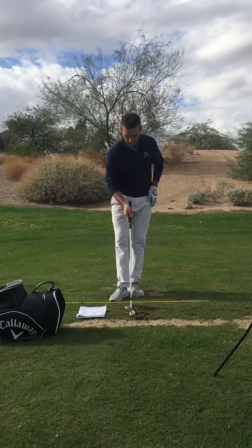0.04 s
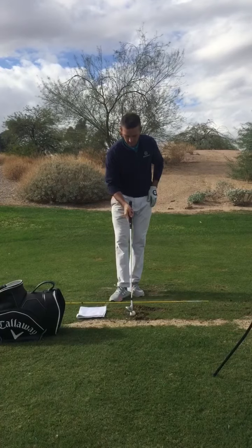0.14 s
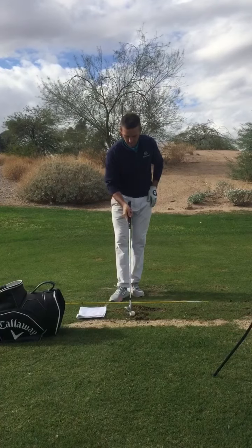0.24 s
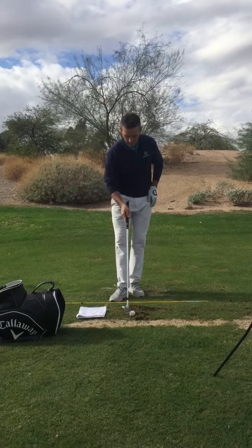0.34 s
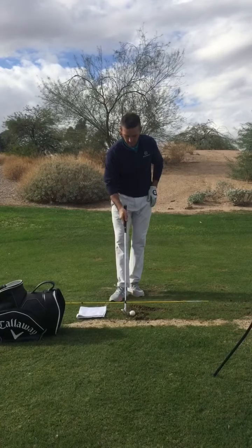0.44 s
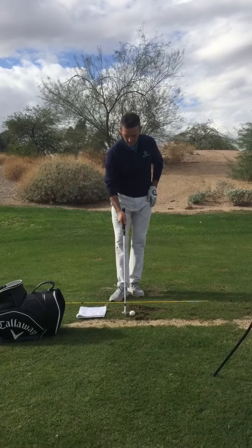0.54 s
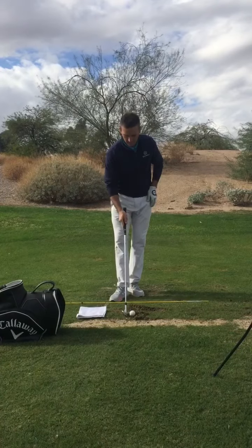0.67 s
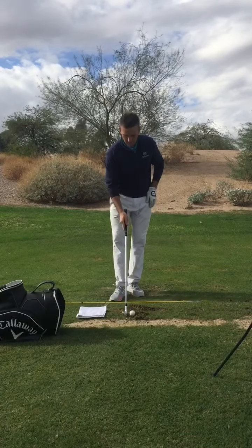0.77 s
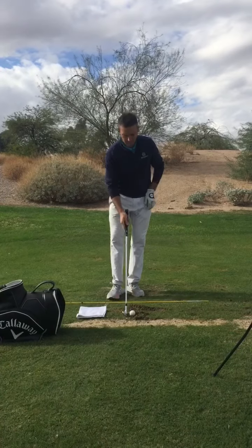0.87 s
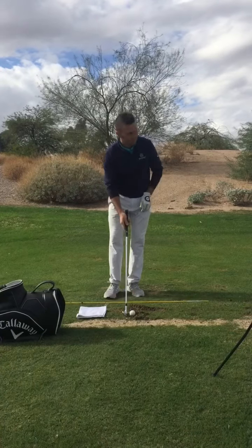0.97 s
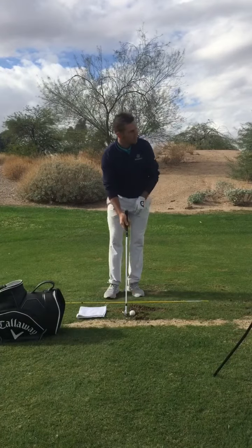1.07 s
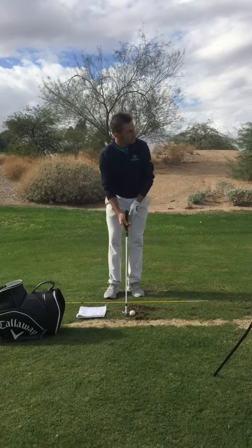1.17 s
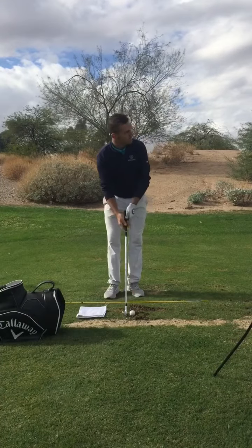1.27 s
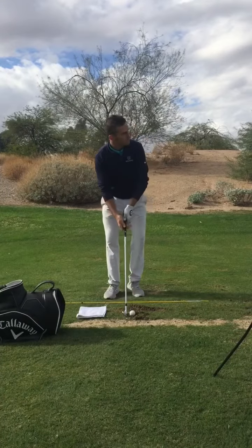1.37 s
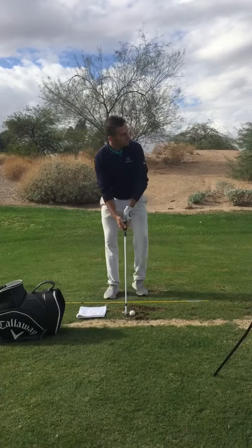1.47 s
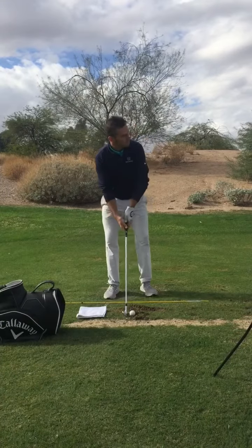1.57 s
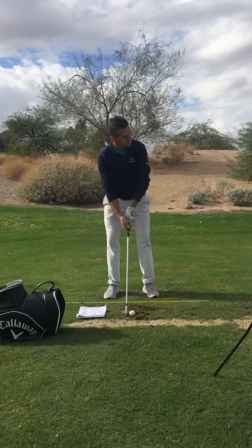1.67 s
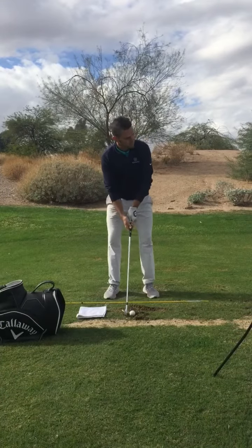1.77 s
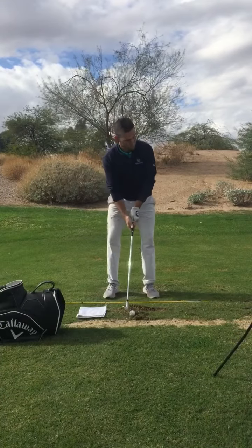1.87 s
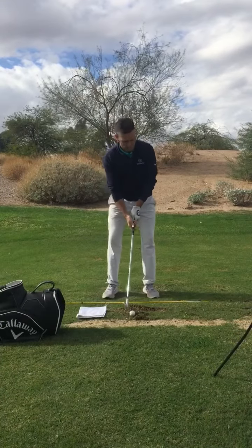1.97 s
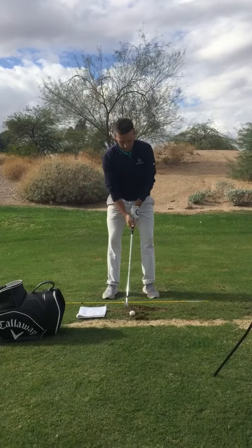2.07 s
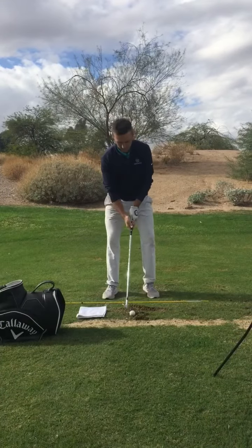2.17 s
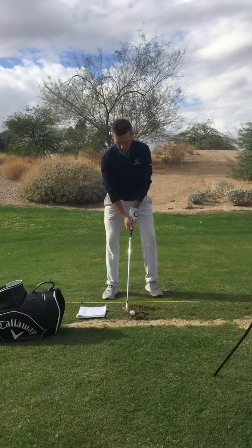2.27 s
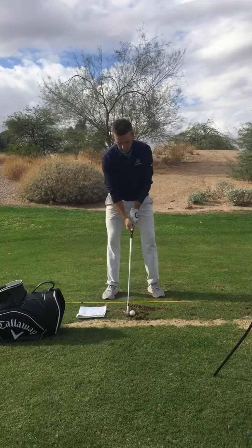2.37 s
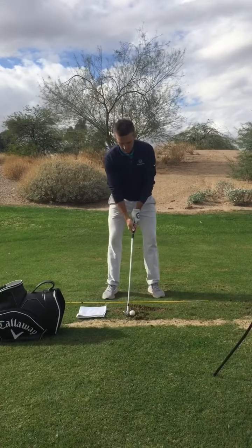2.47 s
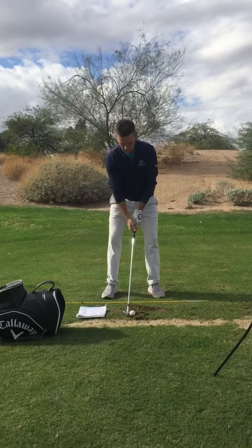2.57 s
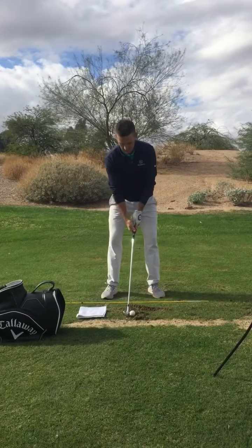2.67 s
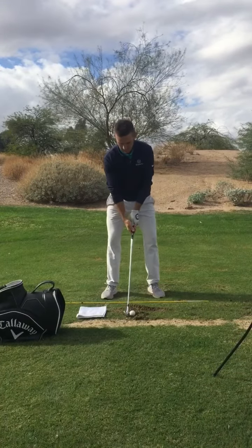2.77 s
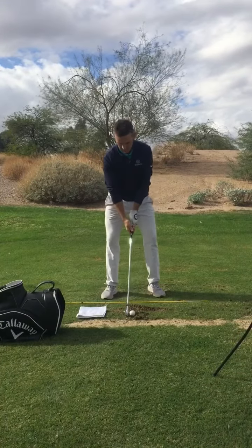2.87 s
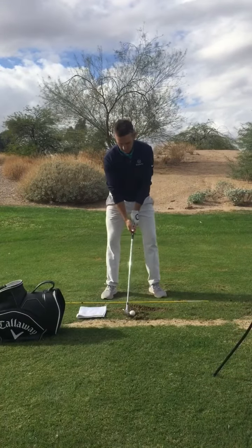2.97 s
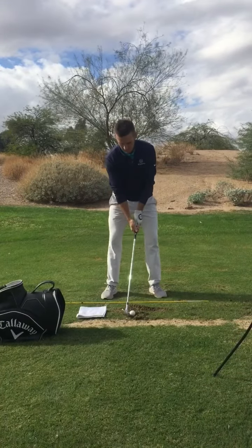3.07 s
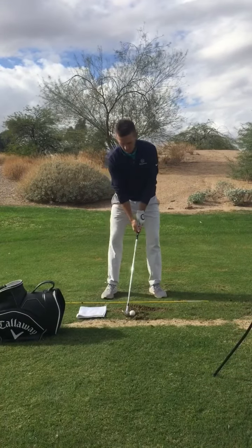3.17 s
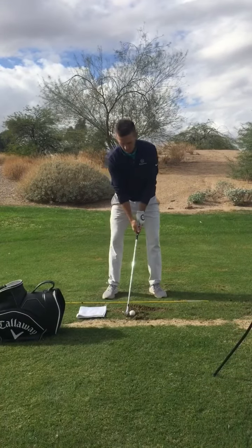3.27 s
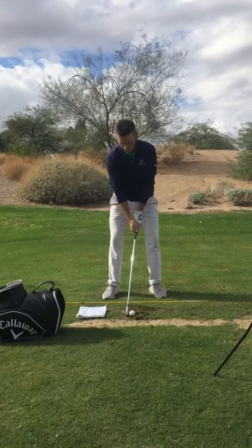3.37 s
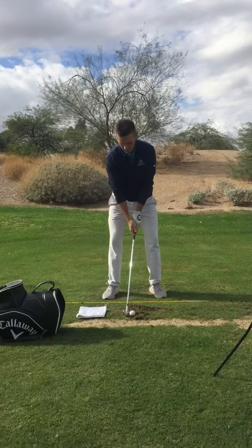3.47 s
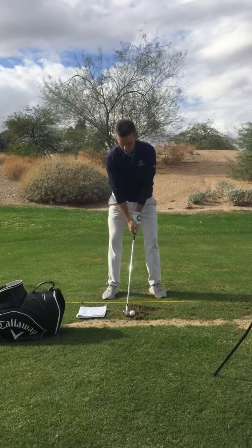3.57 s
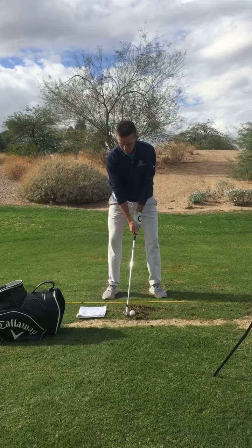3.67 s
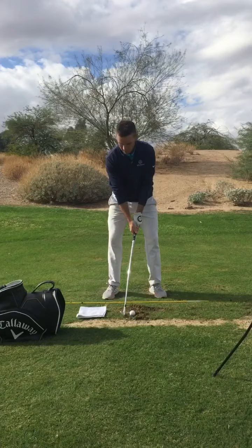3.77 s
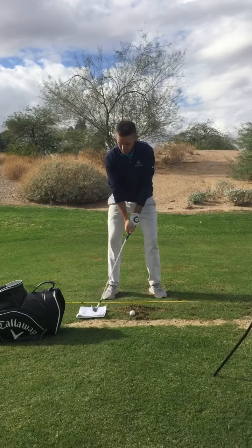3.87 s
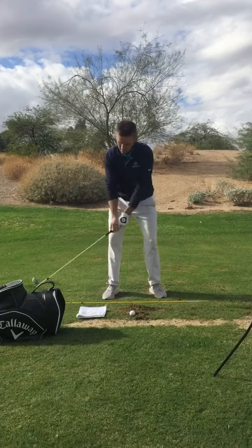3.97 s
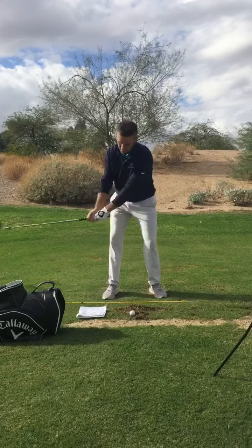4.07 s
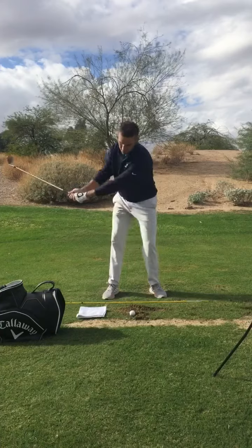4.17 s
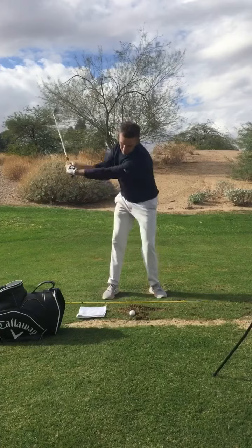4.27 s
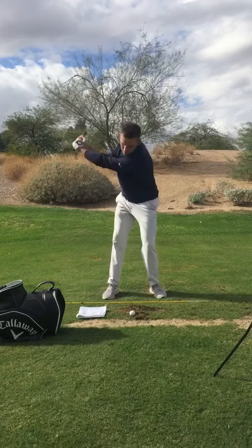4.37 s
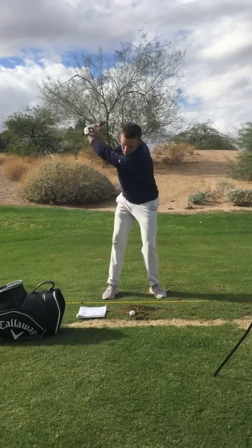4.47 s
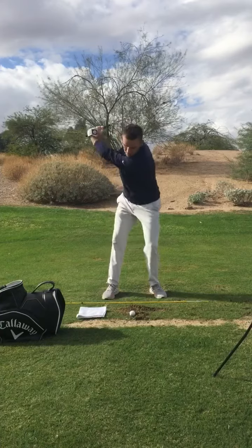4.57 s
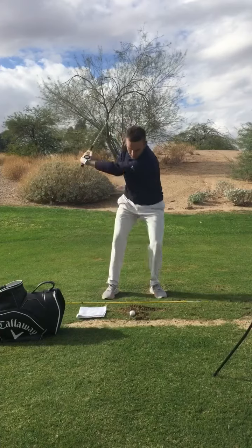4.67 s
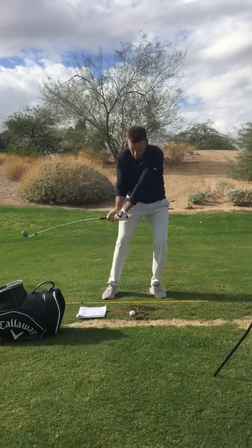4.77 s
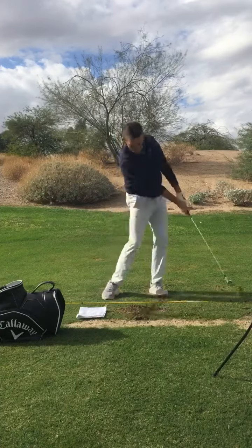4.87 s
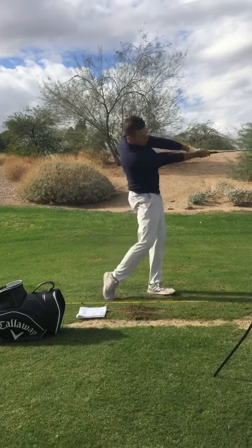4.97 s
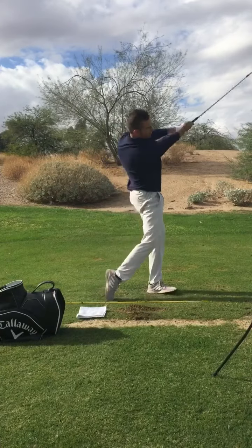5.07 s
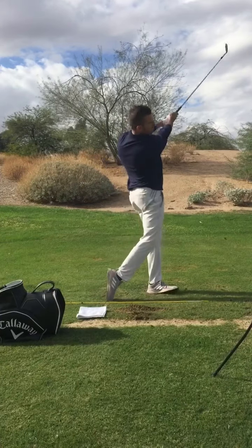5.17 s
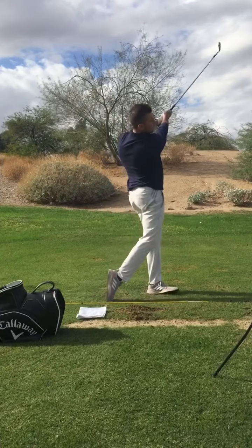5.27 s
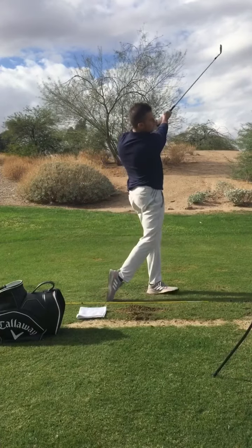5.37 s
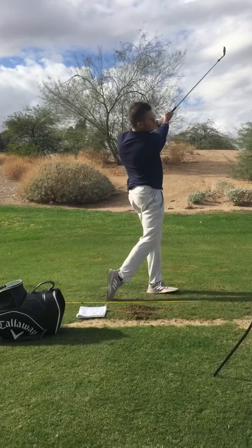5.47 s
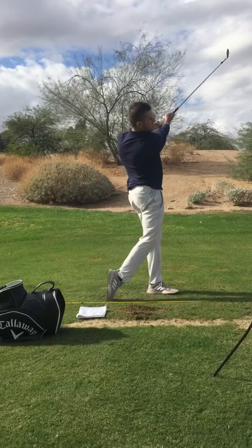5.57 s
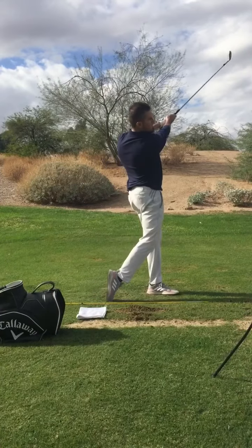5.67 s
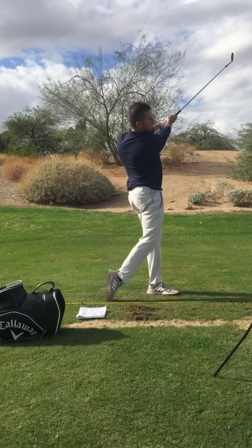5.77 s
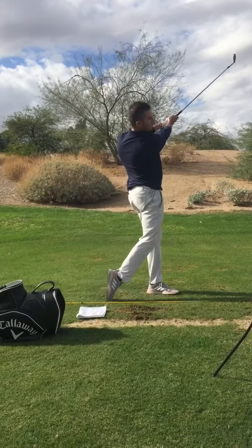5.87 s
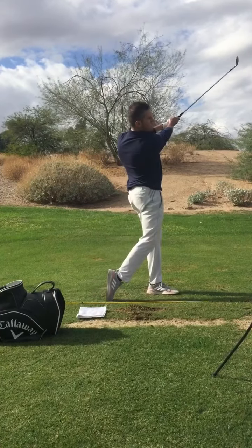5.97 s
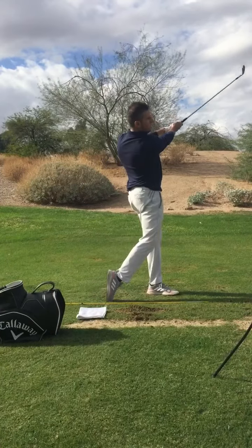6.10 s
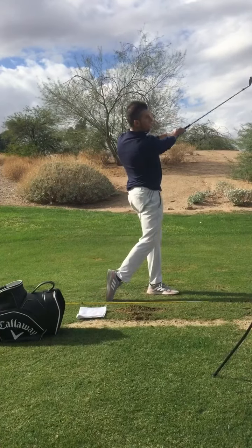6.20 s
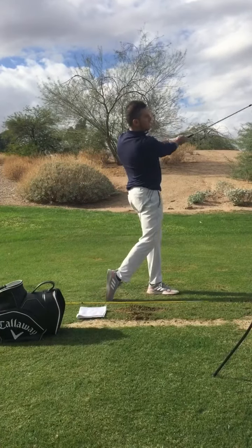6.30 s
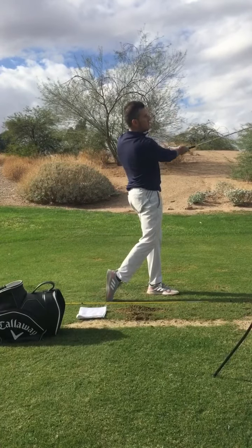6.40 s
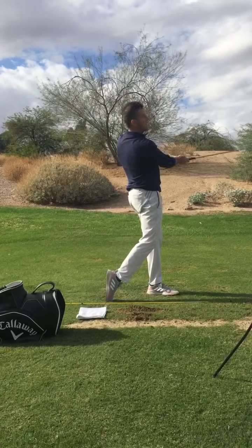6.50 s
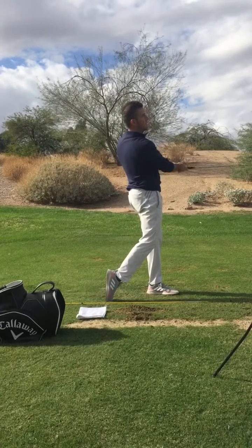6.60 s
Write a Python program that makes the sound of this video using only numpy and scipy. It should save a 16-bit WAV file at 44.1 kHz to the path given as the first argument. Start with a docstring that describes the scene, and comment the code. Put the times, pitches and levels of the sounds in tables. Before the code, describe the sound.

On an open practice range, distant traffic hums faintly under a low breeze that thumps the microphone now and then. A small bird chirps once early on, and a club softly brushes grass. After a long wait, an iron swishes down, clicks brightly on a golf ball and cuts the turf with a short knock. Soil sprays and patters, a dull tail fades, and wind buffets return near the end, heard from a few metres.

```python
"""An open practice range, one microphone a few metres from a golfer who hits an iron shot off the turf.
Far traffic hums as wavering noise that rises by chance; a breeze rumbles, its eddies buffet the microphone.
One bird chirps, a gliding fluttering tone; the club brushes the grass in a soft swell of noise.
The club swishes down as swelling noise, rings on the ball as damped sines and cuts the turf in a
burst of noise; the turf knocks, random grains of soil spray and patter, and a dull tail dies away."""
import sys
import numpy as np
from scipy import signal
from scipy.fft import rfft, irfft, next_fast_len
from scipy.io import wavfile
from scipy.ndimage import uniform_filter1d

SR = 44100
rng = np.random.default_rng(int(sys.argv[2]) if len(sys.argv) > 2 else 0)


def file_out(sig):
    """Save sig as 16-bit WAV at sys.argv[1]."""
    # one column per channel
    cols = np.atleast_2d(sig).T
    # limit, then scale
    lim = np.clip(cols, -1, 1)
    pcm = np.round(lim * 32767).astype(np.int16)
    wavfile.write(sys.argv[1], SR, pcm)


N = 292824

IMPACT_S, CHIRP_S = 4.9475, 0.49


def from_db(db):
    """Decibels to amplitude gain."""
    return 10 ** (np.asarray(db) / 20)


def rms_one(x):
    """Scale to rms 1."""
    return x / np.sqrt(np.mean(x ** 2) + 1e-20)


def over_time(rows):
    """A level in dB at every sample, in straight lines between rows of seconds and dB."""
    s, db = np.transpose(rows)
    return np.interp(np.arange(N) / SR, s, db)


def coloured(x, points):
    """Filter a sound by a curve of Hz and dB that falls 30 dB per octave beyond its ends; rms 1."""
    hz, db = np.transpose(points)
    size = next_fast_len(N)
    octave = np.log2(np.maximum(np.arange(size // 2 + 1) * SR / size, 1))
    curve_octave = np.log2(hz)
    beyond = np.abs(octave - np.clip(octave, curve_octave[0], curve_octave[-1]))
    gain = from_db(np.interp(octave, curve_octave, db) - 30 * beyond)
    return rms_one(irfft(rfft(x, size) * gain, size)[:N])


def noise(points):
    """Smooth random noise of a given spectrum; rms 1."""
    return coloured(rng.standard_normal(N), points)


def drift(hz):
    """Random wandering, low-passed at hz; rms 1."""
    low_pass = signal.butter(2, hz, fs=SR, output="sos")
    return rms_one(signal.sosfilt(low_pass, rng.standard_normal(N)))


def swell(s, width):
    """A smooth bell-shaped rise and fall centred on s."""
    return np.exp(-((np.arange(N) / SR - s) / width) ** 2)


def dying(s, t60):
    """An envelope that starts at s and falls 60 dB in each t60."""
    age = np.arange(N) / SR - s
    return (age >= 0) * from_db(-60 * np.clip(age / t60, 0, 4))


def click(s):
    """One unit impulse."""
    return (np.arange(N) == round(s * SR)) * 1.


def ring(force, modes):
    """Damped sines set off by a force, neighbouring modes in opposite sense."""
    out = np.zeros(N)
    for k, (hz, db, t60) in enumerate(modes):
        r = np.exp(-np.log(1000) / (t60 * SR))
        w = 2 * np.pi * hz / SR
        mode = signal.lfilter([0, np.sin(w)], [1, -2 * r * np.cos(w), r * r], force + 1e-18)
        out += (-1) ** k * from_db(db) * mode
    return out


def band_pass(x, low_hz, high_hz):
    """Keep one band."""
    return signal.sosfilt(signal.butter(3, [low_hz, high_hz], "band", fs=SR, output="sos"), x + 1e-18)


def eddy(s, hz, width_turns=0.56):
    """One puff of air sucks and then pushes on the diaphragm: (its samples, its pressure)."""
    first = max(int((s - 4 / hz) * SR), 0)
    last = min(int((s + 4 / hz) * SR), N)
    near = np.arange(first, last)
    turns = hz * (near / SR - s)
    return near, np.sin(2 * np.pi * turns) / (1 + (turns / width_turns) ** 2) ** 2


def traffic(waver_db=1.0, waver_hz=9, split_hz=950, swell_db=0.5, swell_hz=4, air_db=-75.5):
    """Tyres on a far road merge into a hum whose low and high parts waver apart, under a steady hiss."""
    # Far traffic. Each row: time in seconds, level in dB before the random swelling.
    road_level = [(0, -52.5), (.41, -54), (1.11, -52), (1.87, -53.5), (2.6, -53), (3.5, -52), (3.62, -54),
                  (4.5, -52), (5.2, -52), (6.35, -51), (6.64, -53.5)]
    # Colour of the far road. Each row: frequency in Hz, relative level in dB per Hz.
    road_colour = [(250, -14), (370, -15), (480, -7.5), (650, -0.5), (950, 0.5), (1200, -3.5), (1500, -11),
                   (2100, -25.5), (2800, -36)]
    # Hiss of the still air. Each row: frequency in Hz, relative level in dB per Hz.
    air_colour = [(2000, 0), (4000, 0), (4500, -1.2), (4900, -5.5), (5300, -2.2), (6300, -2.7),
                  (7700, -6.7), (8500, -4.7), (9800, -6.5), (10450, -12), (11000, -7.5), (15500, -10)]
    hum = noise(road_colour)
    low = signal.sosfiltfilt(signal.butter(3, split_hz, fs=SR, output="sos"), hum)
    high = hum - low
    wavering = low * from_db(waver_db * drift(waver_hz)) + high * from_db(waver_db * drift(waver_hz))
    swelling = from_db(over_time(road_level) + swell_db * drift(swell_hz))
    return swelling * wavering + from_db(air_db) * noise(air_colour)


def breeze(rumble_db=1.0, lumps_db=2, lumps_hz=7):
    """A lumpy low rumble of noise that follows the strength of the wind."""
    # Strength of the breeze. Each row: time in seconds, level in dB before trim and lumps.
    wind_level = [(0, -50), (1.1, -50.5), (1.85, -53.5), (2.3, -50), (3.45, -47), (3.85, -51),
                  (4.95, -45.5), (5.6, -49), (6.3, -46.5), (6.64, -50)]
    # Breeze on the microphone. Each row: frequency in Hz, relative level in dB per Hz.
    wind_colour = [(24, -41), (32, -23), (41, -9), (57, -1.5), (110, 0.5), (160, -5.5), (220, -12.5),
                   (290, -26.5), (400, -30.5)]
    lumpy_db = over_time(wind_level) + rumble_db + lumps_db * drift(lumps_hz)
    return from_db(lumpy_db) * noise(wind_colour)


def bird(flutter=0.3, flutter_hz=92, rasp_db=-70.5, rasp_peak_s=0.012, rasp_width_s=.015):
    """A raspy start of noise, then a whistle that sags to a resting note with a fast flutter."""
    length_s, attack_s, release_s = 0.069, 0.026, .016
    whistle_db, start_hz, rest_hz, sag_s = -57.5, 4600, 4030, 0.039
    age = np.arange(N) / SR - CHIRP_S
    hz = rest_hz + (start_hz - rest_hz) * np.exp(-np.maximum(age, 0) / sag_s)
    envelope = np.clip(np.minimum(age / attack_s, (length_s - age) / release_s), 0, 1)
    fluttering = 1 + flutter * np.sin(2 * np.pi * flutter_hz * age)
    whistle = envelope * fluttering * np.sin(2 * np.pi * np.cumsum(hz) / SR)
    rasp_noise = noise([(4400, -20), (4700, -4), (5900, -1), (6300, -20)])
    rasp = swell(CHIRP_S + rasp_peak_s, rasp_width_s) * rasp_noise
    return from_db(whistle_db) * whistle + from_db(rasp_db) * rasp


def bird_echo(level_db=-77, delay_s=0.18, width_s=.13):
    """The chirp comes back from the bushes as a faint smear of noise."""
    smear = noise([(3800, -10), (4250, -5), (4520, 0), (4720, -18)])
    return from_db(level_db) * swell(CHIRP_S + delay_s, width_s) * smear


def grass_brush(s=0.716, width_s=0.094, level_db=-73):
    """The club sole rustles softly over the grass while the ball is lined up: a swell of noise."""
    # Rustle of the grass. Each row: frequency in Hz, relative level in dB per Hz.
    brush_colour = [(2000, -1), (3500, 3), (4400, -2), (4900, -13), (6400, -8), (7500, -14), (12000, -22)]
    return from_db(level_db) * swell(s, width_s) * noise(brush_colour)


def gusts(level_db=0.56, flank_db=-3.5, scatter_db=1.5, scatter_octaves=0.19, jitter=0.29, count=12):
    """Each gust is an uneven run of eddies that tend to be weaker and slower towards its edges."""
    # Gusts on the microphone. Each row: centre in seconds, level of the middle eddy in dB before trim,
    # its pitch in Hz, length in seconds between the edges.
    gust_rows = [(1.244, -37, 86, 0.035), (1.307, -23, 95, 0.018), (1.324, -28, 63.5, .022),
                 (2.05, -29, 119, 0.019), (2.068, -33, 110, .015), (2.082, -30, 90, .012),
                 (2.095, -18, 125, 0.016), (2.177, -32.5, 119, 0.019), (2.755, -28, 84.4, 0.021),
                 (2.766, -23.5, 68, 0.018), (2.886, -31.5, 99, 0.03), (2.923, -33, 75, .02),
                 (3.148, -35, 98, .07), (3.418, -34.5, 70, .03), (3.486, -36.5, 70, .06),
                 (3.545, -33, 70, 0.059), (5.843, -34, 65, .06), (5.925, -35, 65, 0.03),
                 (5.981, -35, 70, .06), (6.159, -30, 70, 0.09), (6.204, -30, 58, 0.029),
                 (6.343, -29, 100, .03), (6.352, -22.5, 235, 0.018), (6.372, -31, 140, .03),
                 (6.384, -26, 390, 0.01), (6.393, -25, 147, .022), (6.402, -27, 120, .03),
                 (6.411, -22.5, 175, 0.018), (6.431, -27, 150, .025), (6.486, -29, 65, .03),
                 (6.506, -29, 220, .012), (6.511, -27, 115, .02), (6.524, -29.5, 110, .09),
                 (6.548, -33, 115, .04)]
    # loss of level and of pitch at the edge; the pitch floor holds before the random scatter
    gap_s, edge_loss_db, edge_octaves, floor_hz = 0.015, 8, 0.67, 58
    out = np.zeros(N)
    steps = np.arange(-count, count + 1)
    for s, db, hz, length in gust_rows:
        chances = rng.standard_normal((len(steps), 3))
        for step, (late, louder, higher) in zip(steps, chances):
            flank = step != 0  # the middle eddy is not scattered
            offset = gap_s * (step + flank * jitter * late)
            edge = abs(offset) / (length / 2)
            if edge < 2:  # eddies fade on past the edge, to twice its distance
                centre_hz = max(hz * 2 ** (-edge_octaves * edge), floor_hz)
                near, push = eddy(s + offset, centre_hz * 2 ** (flank * scatter_octaves * higher))
                eddy_db = db + level_db - edge_loss_db * edge
                eddy_db += flank * (flank_db + scatter_db * louder)
                out[near] += from_db(eddy_db) * push
    return out


def buffeting(churn_db=-11.5, follow_s=0.018):
    """The gusts press on the diaphragm, with fine turbulent noise that follows their strength."""
    push = gusts()
    power = uniform_filter1d(push ** 2, max(int(follow_s * SR), 1))
    strength = np.sqrt(np.maximum(power, 0))
    churn = noise([(60, 3), (130, 4), (230, -2), (330, -14), (520, -26)])
    return push + from_db(churn_db) * strength * churn


def background_rises(t60=.02, low_hz=500, high_hz=2200):
    """Small chance rises in the background noise, drawn as faint, dull, short damped sines."""
    # Chance rises. Each row: start in seconds, level in dB before the band-pass, frequency in Hz.
    rise_rows = [(1.354, -38, 888), (1.813, -37, 869), (2.628, -42, 1500), (3.655, -41, 1030)]
    rises = sum(ring(click(s), [(hz, db, t60)]) for s, db, hz in rise_rows)
    return band_pass(rises, low_hz, high_hz)


def swish(hiss_db=-49, steepness=1.7, loudest_s=4.927, hiss_half_s=.031, top_db=-60.5, top_steepness=6):
    """Air torn by shaft and head: noise swells with the sweep, its treble in a narrower peak."""
    # Torn air. Each row: frequency in Hz, relative level in dB per Hz.
    swish_colour = [(250, -8.5), (600, -4), (1000, -3), (2000, 4), (4000, -3), (5500, -17)]
    sweep = 1 / (1 + ((np.arange(N) / SR - loudest_s) / hiss_half_s) ** 2)
    top = noise([(3500, -6), (4800, 0), (7000, -3), (15000, -9)])
    hiss = from_db(hiss_db) * sweep ** steepness * noise(swish_colour)
    return hiss + from_db(top_db) * sweep ** top_steepness * top


def shaft_whoop(level_db=-38, tone_hz=490, steepness=4.7, width_hz=140, brake_t60=.03):
    """The shaft sheds vortices: a rough band of noise that rises with its speed, until the turf stops it."""
    # fastest at the bottom of the arc, half as fast this long before and after
    fastest_s, half_s = 4.943, .065
    t = np.arange(N) / SR
    speed = 1 / (1 + ((t - fastest_s) / half_s) ** 2)
    phase = 2 * np.pi * np.cumsum(tone_hz * speed) / SR
    band = drift(width_hz) * np.sin(phase) + drift(width_hz) * np.cos(phase)
    braking = (t < IMPACT_S) + dying(IMPACT_S, brake_t60)
    return from_db(level_db) * speed ** steepness * braking * band


def strike(ring_db=0.5, cut_db=-23, cut_t60=0.028, cut_delay_s=.0008):
    """The face cracks on the ball and rings in damped sines, then the blade bites the turf in noise."""
    # Broad, quickly damped resonances of the squeezed ball and the face.
    # Each row: frequency in Hz, level in dB before trim, 60 dB decay time in seconds.
    crack_modes = [(2025, -3.1, 0.0091), (4127, -1.5, 0.0085), (8822, -15.3, 0.007), (12263, -26.5, 0.0043)]
    # Club head and ball. Each row: frequency in Hz, level in dB before trim, 60 dB decay time in seconds.
    club_modes = [(916, -22.5, 0.031), (1094, -8.8, 0.0132), (1283, -12.5, 0.0145), (1406, -16.6, 0.0193),
                  (1654, -28.6, 0.031), (1999, -9.2, 0.0157), (2403, -18.5, 0.0083), (2664, -32.9, 0.0194),
                  (2767, -30.4, 0.031), (3324, -33.4, 0.031), (3711, -21.7, 0.0232), (3962, -16.3, 0.0145),
                  (4095, -5.2, 0.0126), (4426, -18.0, 0.0158), (4776, -28.4, 0.0232), (4866, -33.1, 0.0223),
                  (5450, -30.0, 0.031), (5550, -27.3, 0.0176), (6377, -21.9, 0.0083), (7152, -27.7, 0.0122),
                  (8312, -33.8, 0.0225), (8750, -28.6, 0.0119), (9738, -24.7, 0.0149),
                  (11221, -29.5, 0.0201), (12729, -17.8, 0.0083), (13225, -27.2, 0.0187),
                  (13887, -23.4, 0.0083), (14690, -23.5, 0.011)]
    # Blade cutting the turf. Each row: frequency in Hz, relative level in dB per Hz.
    cut_colour = [(800, -16.5), (1100, -7.5), (2000, 2), (3100, -1), (4200, -3), (5200, 3), (7000, 1),
                  (10000, -2), (15000, -14)]
    blow = click(IMPACT_S)
    ball = from_db(ring_db) * (ring(blow, crack_modes) + ring(blow, club_modes))
    cut = from_db(cut_db) * noise(cut_colour) * dying(IMPACT_S + cut_delay_s, cut_t60)
    return ball + cut


def thud(knock_db=-1):
    """The turf gives a short hollow knock of damped sines, then deep bumps as it brakes the blade."""
    # Knock of the turf. Each row: frequency in Hz, level in dB before trim, 60 dB decay time in seconds.
    turf_modes = [(275, -29, 0.045), (390, -23, 0.03), (480, -26, 0.025), (730, -31.4, 0.03)]
    # The ground brakes the blade. Each row: centre in seconds, level in dB, pitch in Hz.
    bump_rows = [(4.956, -30, 150), (4.978, -35, 80)]
    out = from_db(knock_db) * ring(click(IMPACT_S), turf_modes)
    for s, db, hz in bump_rows:
        near, push = eddy(s, hz)
        out[near] += from_db(db) * push
    return out


def divot(grains_per_s=16000, spread_db=2.5, clumps_db=0.8, clumps_hz=50):
    """Fine soil sprays through the grass as clumped random grains; a few larger bits tick in noise."""
    # Thrown soil. Each row: frequency in Hz, relative level in dB per Hz.
    spray_colour = [(900, -1), (2200, 1), (4000, -5), (7500, -7.5), (11000, -13), (15500, -15)]
    # Clods and grit. Each row: start in seconds, level in dB, 60 dB decay time in seconds.
    clod_rows = [(4.9645, -44, .006), (4.9662, -44, .006), (5.003, -57, .01), (5.011, -55, .01),
                 (5.0277, -58, .01), (5.1294, -48, .008)]
    # A clod's tick. Each row: frequency in Hz, relative level in dB per Hz.
    clod_colour = [(1600, -5), (4100, 0), (6000, -8), (7500, -20), (14000, -25)]
    # the spray builds up, holds, then thins out as a power of the time since the blow
    spray_db, attack_s, hold_s, thinning = -57.3, .04, 0.024, 1.6
    landing = rng.random(N) < grains_per_s / SR
    grains = landing * rng.standard_normal(N) * from_db(spread_db * rng.standard_normal(N))
    age = np.arange(N) / SR - IMPACT_S
    build_up = np.clip(age / attack_s, 0, 1) ** .5
    envelope = build_up / np.maximum(age / (attack_s + hold_s), 1) ** thinning
    clumps = from_db(spray_db + clumps_db * drift(clumps_hz))
    spray = clumps * envelope * coloured(grains, spray_colour)
    ticks = sum(from_db(db) * dying(s, t60) for s, db, t60 in clod_rows) * noise(clod_colour)
    return spray + ticks


def range_echo(level_db=-56.5, delay_s=.088, t60=0.43):
    """Bushes and the sandy bank scatter a faint, dull tail of noise that builds up and dies away."""
    age = np.maximum(np.arange(N) / SR - IMPACT_S, 0)
    build_up = np.minimum(age / delay_s, 1) ** 2
    envelope = build_up * from_db(-60 * np.maximum(age - delay_s, 0) / t60)
    tail = noise([(500, -3.0), (1200, 8.5), (2000, 2), (2800, -2), (4500, -11), (9000, -29.0)])
    return from_db(level_db) * envelope * tail


def soil_patter(grains_per_s=5000):
    """Heavier crumbs follow the fine spray as random grains in duller clumps, each fainter than the last."""
    # Clumps of crumbs pattering down. Each row: centre in seconds, level in dB, half length in seconds.
    crumb_rows = [(5.04, -59.5, .026), (5.118, -65, .016), (5.238, -70, .02)]
    grains = (rng.random(N) < grains_per_s / SR) * rng.standard_normal(N)
    clumps = sum(from_db(db) * swell(s, width) for s, db, width in crumb_rows)
    return clumps * coloured(grains, [(1000, 0), (2400, 0), (3500, -5), (6000, -14)])


def scene():
    """The shot and its surroundings at one microphone."""
    surroundings = traffic() + breeze() + bird() + bird_echo() + buffeting() + background_rises()
    shot = swish() + shaft_whoop() + strike() + thud() + divot() + range_echo() + soil_patter()
    return (surroundings + grass_brush() + shot)[None, :]


def record(dry):
    """The deepest rumble is cut, the highest peaks are rounded and the top is cut."""
    low_cut_hz, top_cut_hz = 32, 15900
    lean = signal.sosfilt(signal.butter(3, low_cut_hz, "high", fs=SR, output="sos"), dry)
    rounded = np.tanh(lean)
    return signal.sosfilt(signal.ellip(10, .1, 80, top_cut_hz, fs=SR, output="sos"), rounded)


dry = scene()
out = record(dry)
file_out(out)
```